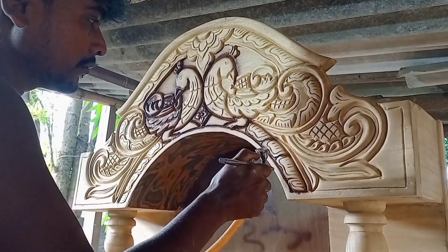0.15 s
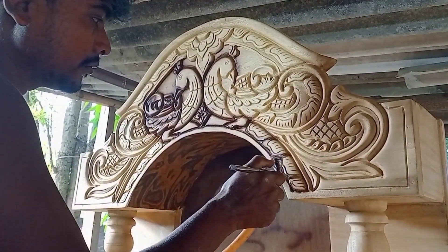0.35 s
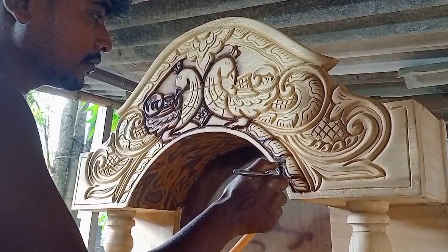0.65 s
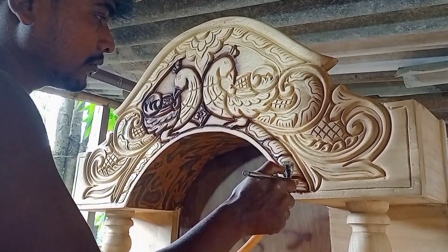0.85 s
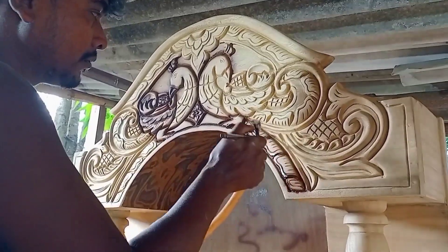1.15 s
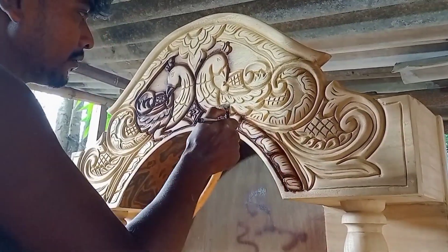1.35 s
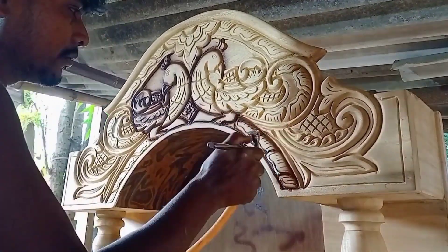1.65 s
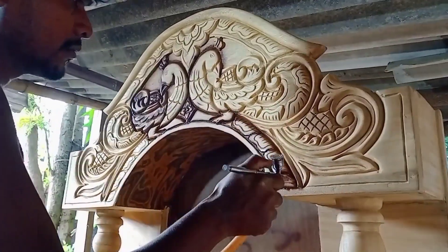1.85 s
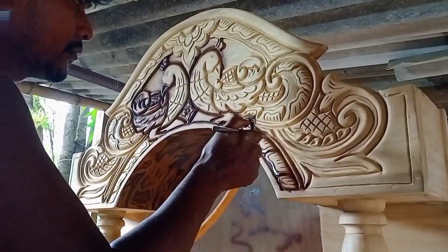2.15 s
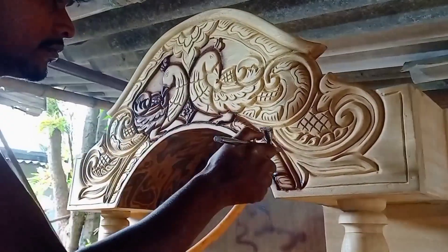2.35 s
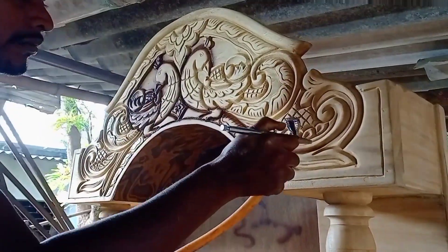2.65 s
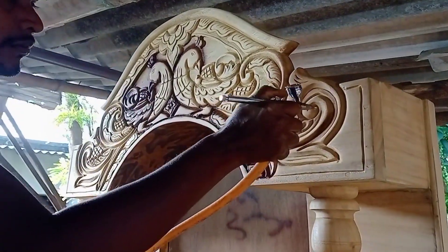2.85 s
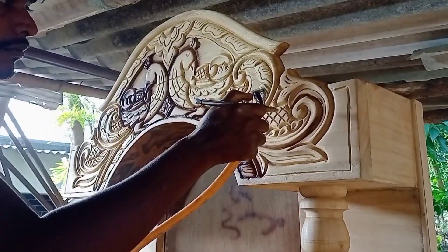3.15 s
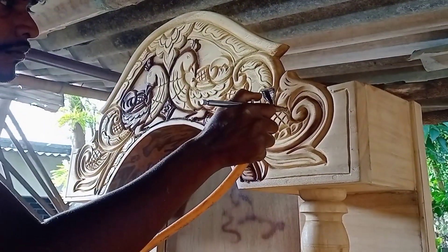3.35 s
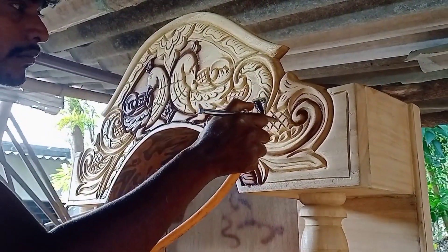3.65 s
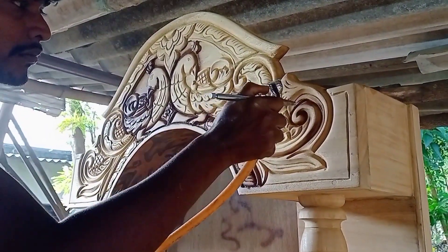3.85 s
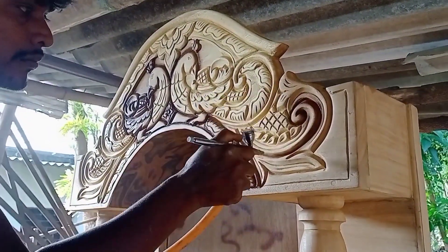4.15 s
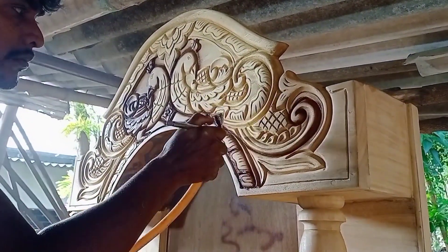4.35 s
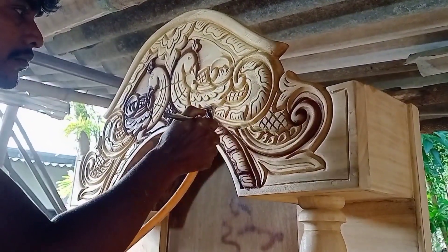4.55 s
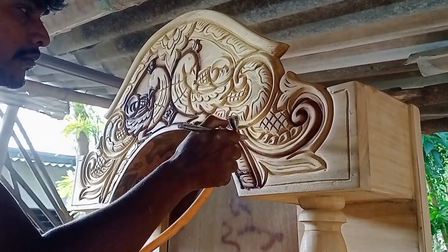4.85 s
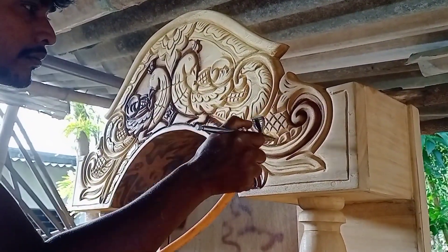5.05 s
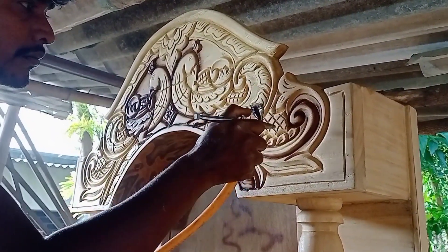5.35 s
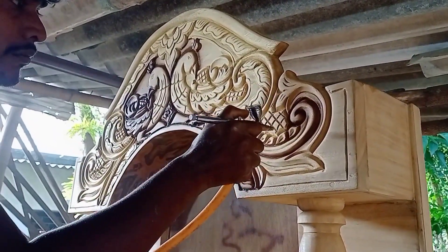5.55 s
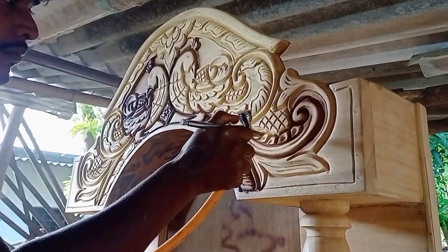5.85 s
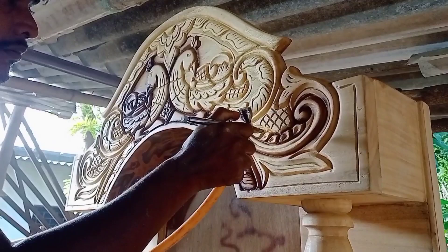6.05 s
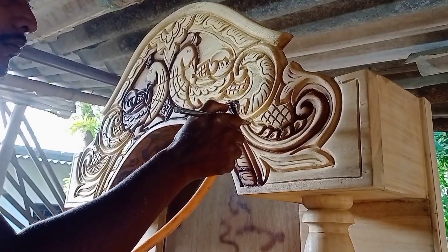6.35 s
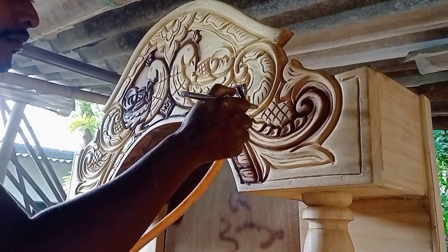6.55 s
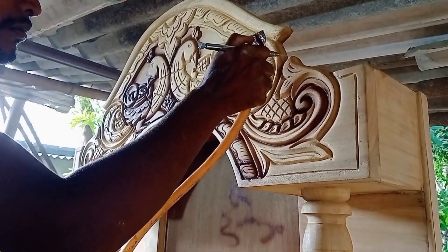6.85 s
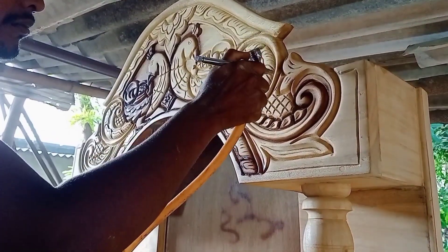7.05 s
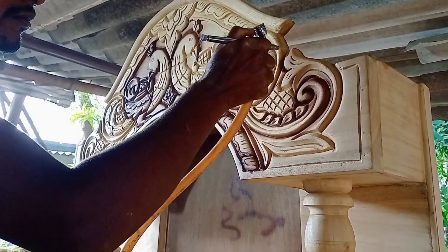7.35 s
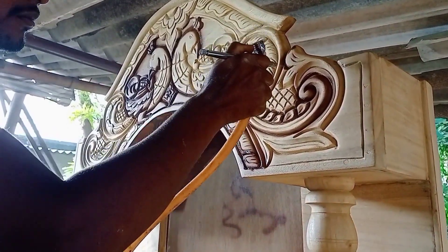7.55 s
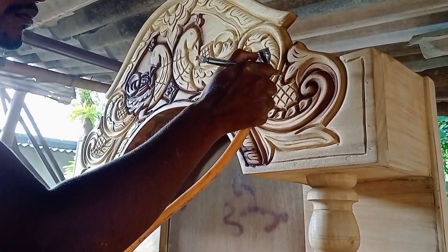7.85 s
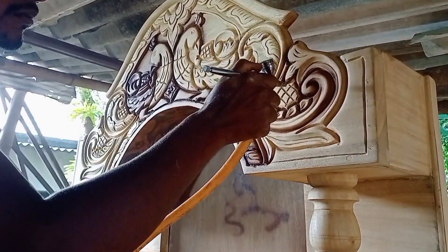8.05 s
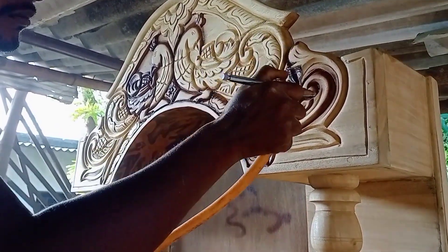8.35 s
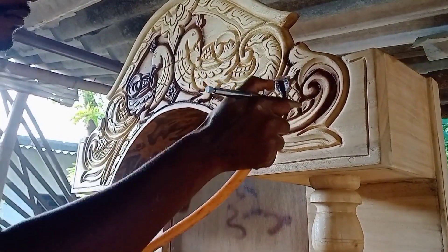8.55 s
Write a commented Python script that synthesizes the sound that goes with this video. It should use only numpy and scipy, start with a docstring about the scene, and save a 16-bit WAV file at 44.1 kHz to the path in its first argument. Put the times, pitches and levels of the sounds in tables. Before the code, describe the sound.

A small compressed-air gun hisses brightly in an open shed, pausing once to bare a low motor hum, then spraying on with flares and thuds.

```python
"""A small compressed-air gun sprays polish over a carved wooden headboard in a tin-roofed workshop: banded noise.
Soft low hoots from outside, perhaps a dove, begin at 0.45 s: sagging sines. The trigger is let go at 0.52 s,
baring a low hum of sines and dull noise, and pulled again at 0.8 s. The hiss changes colour at 1.9-2.6 s as the
jet leaves the carved arch; deflected air thuds on the microphone at 2.2-6.4 s. Grooves flare as decaying noise,
strongest at 6.7-7.4 s. The trigger is let go again at 8.46 s and just cracks open at the very end."""
import sys
import numpy as np
from scipy import signal
from scipy.fft import rfft, irfft
from scipy.io import wavfile

SR = 44100
rng = np.random.default_rng(int(sys.argv[2]) if len(sys.argv) > 2 else 0)


def pcm_store(signal):
    """Save signal as 16-bit PCM."""
    levels = np.round(np.clip(np.atleast_2d(signal), -1, 1) * 32767)
    wavfile.write(sys.argv[1], SR, levels.astype(np.int16).T)


N = 384111
T_S, FREQ_HZ = np.arange(N) / SR, np.fft.rfftfreq(N, 1 / SR)


def gain_of(db):
    """Amplitude factor of a level in dB."""
    return 10 ** (np.asarray(db) / 20)


def evened(x):
    """Scales to rms 1."""
    return x / np.sqrt(np.mean(x ** 2) + 1e-20)


def read(points):
    """Interpolates a spectrum in dB on a log-frequency axis."""
    hz, db = np.transpose(points)
    return np.interp(np.log(FREQ_HZ + 1), np.log(hz + 1), db)


def follow(rows):
    """The columns of a curve table at every sample."""
    point_s, *columns = np.transpose(rows)
    return [np.interp(T_S, point_s, column) for column in columns]


def bell(x, centre, half):
    """Gaussian bump of height 1; half is its standard deviation."""
    return np.exp(-.5 * ((x - centre) / half) ** 2)


def coloured(x, gain):
    """Filters by a gain for each frequency; rms 1."""
    return evened(irfft(rfft(x) * gain, N))


def noise(spectrum_db):
    """Random noise with a spectrum in dB; rms 1."""
    return coloured(rng.standard_normal(N), gain_of(spectrum_db))


def drift(rate_hz):
    """Slow chance, rolled off above a rate; rms 1 before resampling."""
    slow_t_s = T_S[::32]
    hz = np.fft.rfftfreq(len(slow_t_s), slow_t_s[1])
    spectrum = rfft(rng.standard_normal(len(slow_t_s))) / (1 + (hz / rate_hz) ** 2)
    slow = irfft(spectrum, len(slow_t_s))
    return np.interp(T_S, slow_t_s, evened(slow))


def band(lo_hz, hi_hz, order=12):
    """Band-pass gain with soft edges: the difference of two low-pass power curves."""
    below_hi = 1 / (1 + (FREQ_HZ / hi_hz) ** (2 * order))
    below_lo = 1 / (1 + (FREQ_HZ / lo_hz) ** (2 * order))
    return np.sqrt(abs(below_hi - below_lo))


def resonate(x, pitch_hz, width_hz):
    """A resonance of gain 1 that follows the curve pitch_hz."""
    turn = np.exp(2j * np.pi * np.cumsum(pitch_hz) / SR)
    pole = np.exp(-np.pi * width_hz / SR)
    return 2 * (turn * signal.lfilter([1 - pole], [1, -pole], x / turn)).real


# dull workshop noise: hz, relative_db_per_hz
SHOP_SPECTRUM = [(18, -60), (30, -25.5), (190, -5.5), (274, -12), (346, -11.5), (581, -14.5), (662, -17),
                 (1730, -15), (2840, -21.5), (5440, -40), (6700, -52), (7630, -44), (9150, -35),
                 (10200, -53), (15000, -57)]
# motor hum partials, before the BACKGROUND offset: pitch_hz, peak_db
HUM_PARTIALS = [(101, -78), (120, -61.5), (150.5, -58.5)]
# slow change: time_s, shop_offset_db, hum_offset_db, leak_level_db
BACKGROUND_CURVE = [(.65, 1.5, 0.5, -86), (8.55, -3.5, -3.5, -76)]
SHOP_DB = -56  # before the BACKGROUND offset
LEAK_HZ, LEAK_WIDTH_HZ = 6850, 460
SWELL_AT_S, SWELL_HALF_S, SWELL_DB = .68, 0.028, 3.5


def workshop():
    """Dull noise and wavering hum sines swell briefly together; the shut valve's leak is thin narrow-band noise."""
    shop_db, hum_db, leak_db = follow(BACKGROUND_CURVE)
    hum = sum(gain_of(db + hum_db + 2 * drift(4.9)) * np.sin(2 * np.pi * hz * T_S + drift(8.0))
              for hz, db in HUM_PARTIALS)
    whistle = coloured(rng.standard_normal(N), bell(FREQ_HZ, LEAK_HZ, LEAK_WIDTH_HZ / 2))
    leak = gain_of(leak_db + 2 * drift(20)) * whistle
    swell = gain_of(SWELL_DB * bell(T_S, SWELL_AT_S, SWELL_HALF_S))
    shop = gain_of(SHOP_DB + shop_db) * noise(read(SHOP_SPECTRUM))
    return swell * (shop + hum) + leak


# soft hoots: middle_s, level_db, pitch_hz, half_length_s
HOOT_NOTES = [(0.452, -41, 365, .017), (.533, -31.5, 356, 0.011), (0.668, -38, 356, 0.01),
              (0.733, -37.5, 335, 0.0065), (0.766, -40, 338, 0.014), (0.927, -40, 380, .01),
              (1.003, -40, 338, 0.018), (1.983, -41.5, 350, .015), (2.02, -35, 336, 0.0069),
              (3.953, -43, 395, 0.017), (4.035, -33.5, 340, 0.014), (4.242, -40, 345, 0.01),
              (4.322, -40, 340, .019), (5.546, -36, 343, 0.0061)]


def hoots(fall_hz_per_s=700):
    """Short sine notes that sag in pitch, slightly unsteady in phase and level."""
    out = np.zeros(N)
    unsteady = .12 * drift(70)
    for middle_s, level_db, pitch_hz, half_s in HOOT_NOTES:
        near = abs(T_S - middle_s) < 4 * half_s
        t_s = T_S[near] - middle_s
        turns = pitch_hz * t_s - fall_hz_per_s * t_s ** 2 / 2 + rng.random()
        note = np.sin(2 * np.pi * turns + 2 * unsteady[near])
        out[near] += gain_of(level_db) * bell(t_s, 0, half_s) * note
    return out * (1 + unsteady)


def rumble(level_db=-56):
    """Moving air: low noise whose level wanders."""
    spectrum = [(25, -26.5), (50, -12), (85, -5.5), (150, -7), (300, -7.0), (700, -10.5), (3000, -68.5)]
    return noise(read(spectrum)) * gain_of(level_db + 4.2 * drift(9.4))


# jet across a rim of the carving: middle_s, level_db, pitch_hz, width_hz, half_length_s
RIM_WHOOSHES = [(.04, -39.5, 660, 300, 0.1), (0.464, -42.5, 557, 250, 0.058),
                (1.724, -42.5, 615, 380, 0.074), (1.74, -36, 1520, 1100, 0.076),
                (2.066, -30, 2440, 300, 0.069), (2.172, -26, 1710, 1480, 0.012),
                (2.37, -34, 3020, 550, 0.13), (2.66, -32.5, 4600, 1000, 0.11), (3.377, -40, 996, 1300, 0.1)]


def whooshes():
    """Air across an edge sounds the hollow behind it for a moment: bell-shaped bands of noise."""
    air = rng.standard_normal(N)
    return sum(gain_of(db) * bell(T_S, s, half_s) * coloured(air, bell(FREQ_HZ, hz, width_hz / 2))
               for s, db, hz, width_hz, half_s in RIM_WHOOSHES)


# hollows in the carving: pitch_hz, width_hz, boost_db (before any scaling by the caller)
HOLLOW_RINGS = [(974, 146, -3), (1502, 120, -4), (1836, 170, 2.5), (2217, 52, 3), (3276, 220, -1.5),
                (3570, 120, -1)]


def hollows_db(shift=0):
    """Narrow spectral bumps and dips that the carving puts on air blown at it."""
    return sum(db * bell(FREQ_HZ, hz * (1 + shift), width_hz / 2) for hz, width_hz, db in HOLLOW_RINGS)


# jet catches in a groove: start_s, level_db, rise_s, decay_s, hiss_shade_db (negative brightens)
GROOVE_FLARES = [(.81, -34, 0.0067, 0.046, -1.5), (1.295, -39, .012, 0.05, -0.5),
                 (6.751, -20.5, 0.0048, 0.074, 11), (6.93, -30.5, 0.025, 0.033, -3.5),
                 (7.24, -22, 0.014, 0.099, 5.5), (7.43, -22, 0.013, 0.021, 0.5)]
# roar of a groove: hz, relative_db_per_hz
GROOVE_SPECTRUM = [(300, -43), (600, -10.5), (800, -2.5), (1000, 9), (1300, -7.5), (1550, 17.5),
                   (1700, -4.5), (2200, 6.5), (2650, 2.5), (3050, 2), (3900, 3), (5500, -41.5),
                   (8000, -53.5)]


def flares(ring=2.04, ragged_db=1.34):
    """A groove fills with air at once and its hollow roar dies as the jet moves on."""
    blow = 0
    for start_s, level_db, rise_s, decay_s, _ in GROOVE_FLARES:
        fade = np.exp(-abs(T_S - start_s) / decay_s)
        blow = blow + gain_of(level_db) * np.where(T_S < start_s, bell(T_S, start_s, rise_s), fade)
    return blow * gain_of(ragged_db * drift(110)) * noise(read(GROOVE_SPECTRUM) + ring * hollows_db())


# deflected air on the microphone: middle_s, thud_db, half_length_s
MIC_BUFFETS = [(2.18, -43, 0.0078), (2.606, -36.5, 0.027), (4.256, -41, 0.013), (4.383, -38, 0.023),
               (4.454, -33, 0.0078), (4.525, -34.5, 0.0069), (4.711, -36, 0.0088), (4.958, -34.5, 0.0052),
               (5.589, -35, 0.017), (5.663, -29, .011), (5.698, -36, 0.013), (5.869, -24, 0.011),
               (5.898, -28, 0.0047), (5.966, -29.5, 0.012), (6.002, -36, 0.0074), (6.187, -35.5, 0.012),
               (6.241, -34.5, 0.01), (6.312, -34, 0.005), (6.428, -28.5, 0.013)]
# thud of a buffet: hz, relative_db_per_hz
BUFFET_SPECTRUM = [(20, -42), (45, -26.5), (80, -1.5), (150, -1.5), (350, 2.5), (700, -0.5), (1000, -0.5),
                   (1500, -4), (2400, -6), (4200, -22)]
# upper spray colour on the face, also the mist of the buffets: hz, relative_db_per_hz
FACE_HIGH = [(3410, -49), (5800, -13.5), (6520, -17.5), (6940, -11), (7700, -9), (8870, -1), (9930, -10.5),
             (11500, -6.5), (12900, -11), (15100, 3.5), (15700, 0.5)]


def buffets(mist_db=5, lumpy_db=0.85):
    """Lumpy low pressure on the microphone, with a splash of bright mist."""
    strength = sum(gain_of(db) * bell(T_S, s, half_s) for s, db, half_s in MIC_BUFFETS)
    thud = noise(read(BUFFET_SPECTRUM)) * gain_of(lumpy_db * drift(150))
    mist_gain = gain_of(read(FACE_HIGH)) * band(6400, 15700, order=5)
    mist = coloured(rng.standard_normal(N), mist_gain)
    return strength * (thud + gain_of(mist_db) * mist)


# echoes from arm, posts and roof: delay_s (before sway), amplitude_share
FAR_ECHOES = [(.0028, 0.16), (.0041, .22), (.0063, 0.18), (.0094, 0.18), (0.0142, 0.14)]
ECHO_S, ECHO_S_PER_S, ECHO_SWAY_S, ECHO_SHARE = .00178, .00004, .0001, 0.32


def reflected(x, sway_s=0.00013):
    """A near echo combs the hiss, later as the hand moves away; farther ones break it into wandering patches."""
    near_delay_s = ECHO_S + ECHO_S_PER_S * T_S + ECHO_SWAY_S * drift(1.44)
    paths = [(near_delay_s, ECHO_SHARE)]
    paths += [(delay_s + sway_s * drift(2.14), share) for delay_s, share in FAR_ECHOES]
    return x + sum(share * np.interp(T_S - delay_s, T_S, x) for delay_s, share in paths)


def spray_colour(low, high, shift):
    """Joins the two halves of a spray spectrum at 5900 Hz and adds the hollows."""
    return gain_of(np.where(FREQ_HZ < 5900, read(low), read(high)) + hollows_db(shift))


HOLLOW_SHIFT = .035  # share of pitch between the lower and higher hollows


def on_carving(air, low, high):
    """Colours the air while the jet slides between lower and higher hollows."""
    higher_share = .5 + .5 * np.tanh(2 * drift(2.0))
    lower = coloured(air, spray_colour(low, high, -HOLLOW_SHIFT / 2))
    higher = coloured(air, spray_colour(low, high, HOLLOW_SHIFT / 2))
    return (1 - higher_share) * lower + higher_share * higher


# aim of the gun: time_s, wood_level_db (before tilt and spurts), nozzle_gap_pitch_hz
AIM_CURVE = [(0, -34, 2530), (1.38, -36, 2860), (1.79, -34, 2320), (2.01, -31.5, 2670), (2.35, -33.5, 2600),
             (2.69, -29, 4260), (2.91, -33, 2670), (3.1, -31, 3030), (3.7, -30.5, 2610), (3.85, -33, 2940),
             (4.0, -31.5, 3330), (4.56, -35.5, 3020), (5.69, -28.5, 3690), (5.91, -34, 3570),
             (6.4, -38.5, 3260), (6.63, -34, 3760), (8.0, -33, 3540), (8.45, -35, 3840)]
# treble before spurts and shading: time_s, nozzle_hiss_db, mist_fizz_db
TREBLE_CURVE = [(0, -29, -29), (0.53, -34.4, -34), (1.0, -36.5, -38), (1.15, -34.1, -31),
                (1.75, -32.5, -29.6), (1.9, -30.5, -32.5), (2.61, -32, -28.7), (2.88, -33.0, -32),
                (3.06, -31, -26.5), (3.51, -39, -28), (3.7, -34.5, -28.7), (3.85, -35.5, -32),
                (4.45, -29, -27), (5.46, -33, -30.6), (5.61, -25.5, -19), (5.8, -32.5, -24.5),
                (7.18, -35, -33.5), (8.45, -35.5, -31.5)]
# sizzle between hiss and fizz: time_s, offset_from_their_mean_db
SIZZLE_CURVE = [(0, -7), (3.9, -8.5), (4.55, -5), (5.75, -11), (6.4, -5), (8.45, -7.5)]
# brief spurts: middle_s, extra_wood_db (scaled down in the roar), extra_treble_db, half_length_s
JET_SPURTS = [(0.443, 5, 4, 0.026), (0.877, 2, 5, 0.07), (1.0, 3, 6.5, 0.047), (1.323, 5, 0.0, 0.046),
              (3.114, 4.5, -2.5, 0.048), (4.354, 2.5, -2, 0.034), (4.45, 4, 1.0, 0.015),
              (4.69, 2.5, 1, 0.049), (5.12, 6.5, -1, 0.027), (5.394, 5, 3, 0.025), (5.723, 5, 0.0, 0.024),
              (6.38, 2.5, 3, 0.026), (6.753, 13.5, 11.5, 0.019), (7.247, 8, 5, 0.015),
              (7.53, -1.5, 3.5, 0.05), (7.724, 4, 3.5, 0.0071), (7.978, 5, -0.5, 0.018),
              (8.345, 5.5, 3.5, 0.021)]
# lower spray colour on the face: hz, relative_db_per_hz
FACE_LOW = [(100, -23.5), (250, -9.5), (450, -14), (800, -6.5), (1200, -6), (1900, -3), (2700, 1.5),
            (3700, 5.5), (4500, 2), (5150, -2), (5500, -9), (5900, -16.5)]
# lower and upper spray colour in the arch: hz, relative_db_per_hz
ARCH_LOW_COLOUR = [(120, -48), (200, -15), (442, -17), (695, -10), (848, -9), (1160, -6), (1260, -6),
                   (2130, -3.5), (2320, -1), (2520, 0), (4260, 2.5), (5900, -12.5), (7670, -44),
                   (13000, -120)]
ARCH_HIGH_COLOUR = [(3410, -43), (5800, -17), (6280, -20), (7570, -12.5), (8090, -6), (8650, -3.5),
                    (9210, -2.5), (9480, -12), (10100, -17.5), (10300, -19), (11600, -10), (13000, -4),
                    (14300, -3.5), (15100, 0), (15700, 0.5)]
# a narrower gap rings higher and trades roar for rush
GAP_REF_HZ, TILT_DB_PER_OCTAVE = 2594, 5.5
DRAUGHT_DB, DRAUGHT_SHARE = -49, 0.32  # follows the level on the wood only in part
SHADE_LAG, SHADE_LENGTH = 0.51, 0.57  # in decay times of the flare


def spray(flutter_db=1.17, own_flutter_db=1.26, gap_ring=0.62, sputter_db=0.2, tremor_db=0.56):
    """One turbulent jet; each size of eddy swells with the aim, and all flutter together as the polish tears off."""
    wood_db, gap_hz = follow(AIM_CURVE)
    hiss_db, fizz_db = follow(TREBLE_CURVE)
    sizzle_db = (hiss_db + fizz_db) / 2 + follow(SIZZLE_CURVE)[0]
    tilt_db = TILT_DB_PER_OCTAVE * np.log2(gap_hz / GAP_REF_HZ)
    roar_db = wood_db - tilt_db
    draught_db = DRAUGHT_DB + DRAUGHT_SHARE * (roar_db - np.mean(roar_db))

    air = reflected(rng.standard_normal(N))
    air = air + gap_ring * resonate(air, gap_hz, width_hz=2400)
    arch_share = np.interp(T_S, [1.9, 2.6], [1, 0])
    arch = on_carving(air, ARCH_LOW_COLOUR, ARCH_HIGH_COLOUR)
    face = on_carving(air, FACE_LOW, FACE_HIGH)
    jet_spectrum = rfft(arch_share * arch + (1 - arch_share) * face)

    flutter = flutter_db * drift(79) + sputter_db * drift(220) + tremor_db * drift(7.4)
    shade_db = sum(db * bell(T_S, s + SHADE_LAG * decay_s, SHADE_LENGTH * decay_s)
                   for s, _, _, decay_s, db in GROOVE_FLARES)
    on_wood_db = sum(db * bell(T_S, s, half_s) for s, db, _, half_s in JET_SPURTS)
    in_treble_db = sum(db * bell(T_S, s, half_s) for s, _, db, half_s in JET_SPURTS) - 0.85 * shade_db

    # level_db, band, share of the common flutter: draught, roar, rush, hiss, sizzle, fizz
    eddies = [(draught_db, band(120, 820, order=4), .7),
              (roar_db + 0.66 * on_wood_db, band(1170, 2200, order=5), .8),
              (wood_db + tilt_db + on_wood_db - shade_db, band(2940, 5960, order=7), 1.0),
              (hiss_db + in_treble_db, band(6160, 9800), 1.05),
              (sizzle_db + in_treble_db, band(11130, 12770), 1.05),
              (fizz_db + in_treble_db, band(13850, 17500), 1.1)]
    out = np.zeros(N)
    for level_db, shape, depth in eddies:
        eddy = evened(irfft(jet_spectrum * shape, N))
        out += eddy * gain_of(level_db + depth * flutter + own_flutter_db * drift(7))
    return out


# pulls of the trigger: fully_open_s, let_go_s
TRIGGER_PULLS = [(-.6, .519), (0.804, 8.456), (8.721, 9.5)]
OPEN_DB_PER_S, SHUT_DB_PER_S = 1098, 1100
KICK_DB, KICK_S = 6, 0.1  # the pressure stored in the hose escapes first
CRACK_LEAD_S, CRACK_DB = .024, -18  # the first touch lets a little air through


def valve():
    """Cracks open, opens fully with a kick of stored pressure, holds, and shuts fast."""
    gain = 0
    for open_s, let_go_s in TRIGGER_PULLS:
        full_db = -OPEN_DB_PER_S * np.maximum(open_s - T_S, 0)
        crack_db = CRACK_DB - OPEN_DB_PER_S * np.maximum(open_s - CRACK_LEAD_S - T_S, 0)
        kick_db = KICK_DB * np.exp(-np.maximum(T_S - open_s, 0) / KICK_S)
        shut_db = SHUT_DB_PER_S * np.maximum(T_S - let_go_s, 0)
        gain = gain + gain_of(np.maximum(full_db, crack_db) + kick_db - shut_db)
    return gain


def scene():
    """The valve gates jet, carving and rumble; buffets, hoots and workshop are added ungated."""
    blown = rumble() + whooshes() + flares() + spray()
    return (workshop() + hoots() + buffets() + valve() * blown)[None]


EDGE_HZ = 15850


def record(dry):
    """The band limit of the recorder: a linear-phase low-pass."""
    low_pass = signal.firwin(1023, EDGE_HZ, window=("kaiser", 9), fs=SR)
    return signal.oaconvolve(dry, low_pass[None], "same")


dry = scene()
out = record(dry)
pcm_store(out)
```